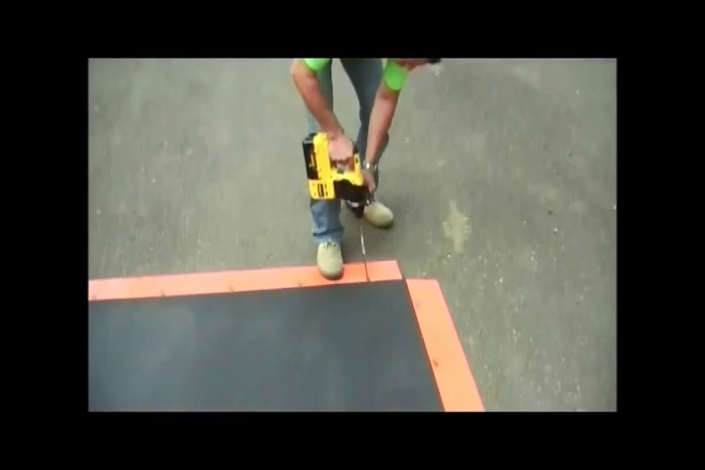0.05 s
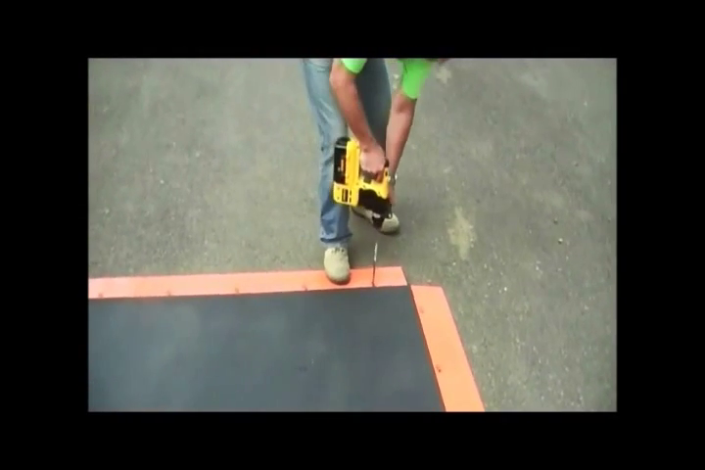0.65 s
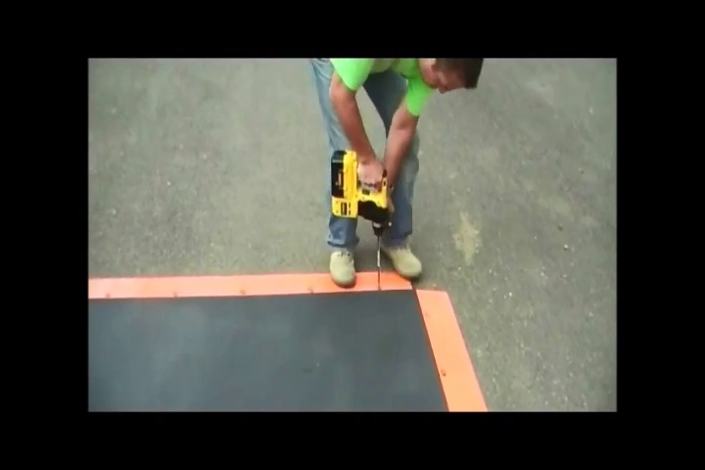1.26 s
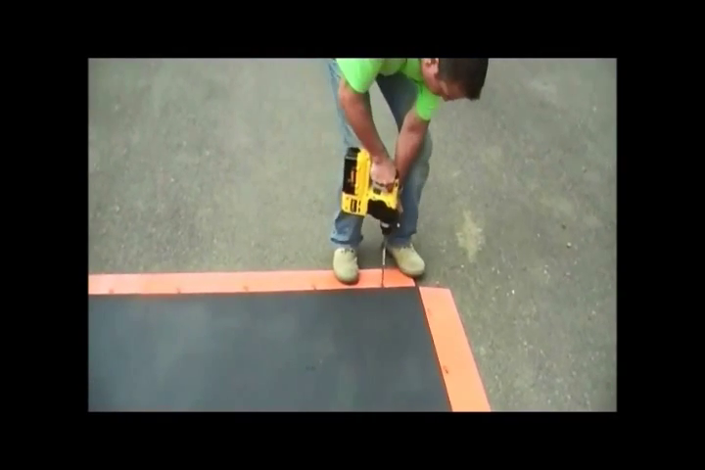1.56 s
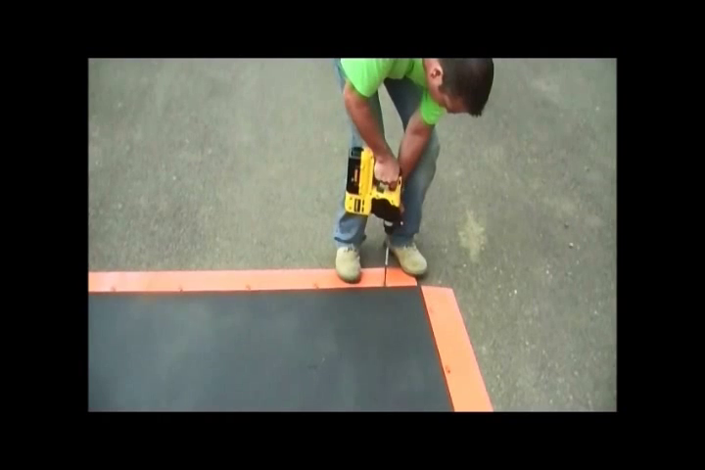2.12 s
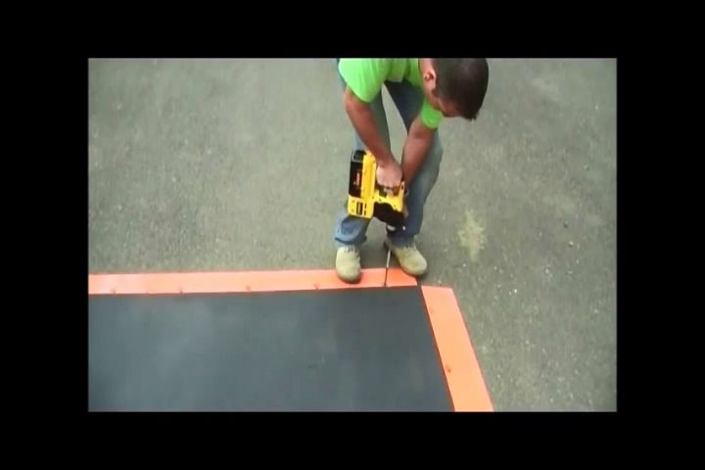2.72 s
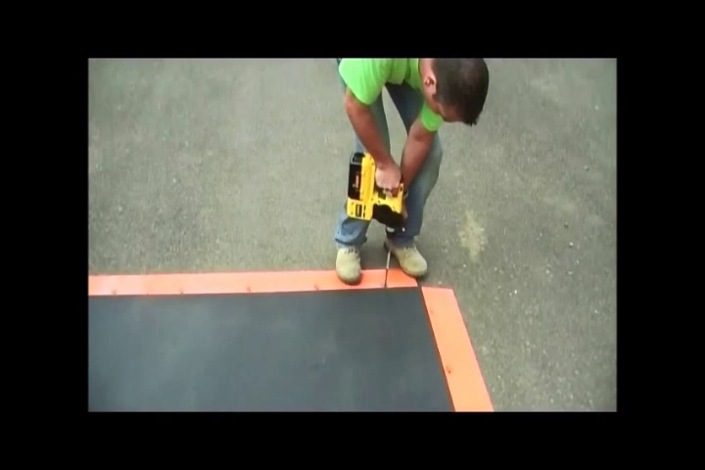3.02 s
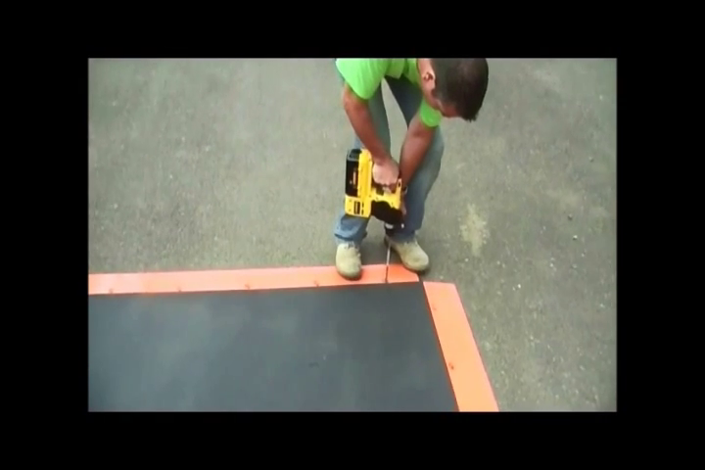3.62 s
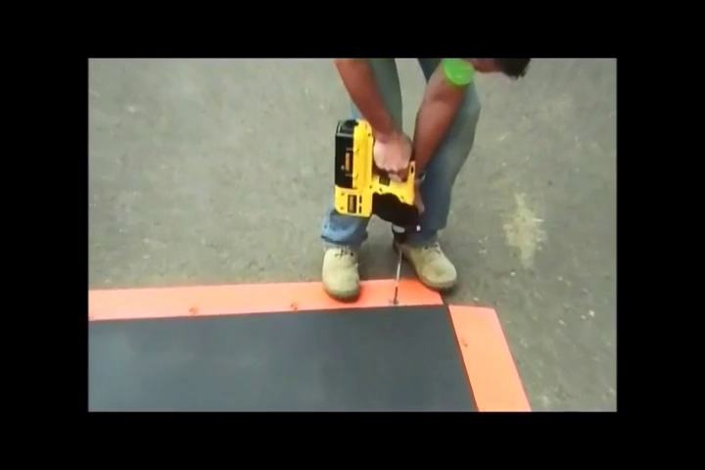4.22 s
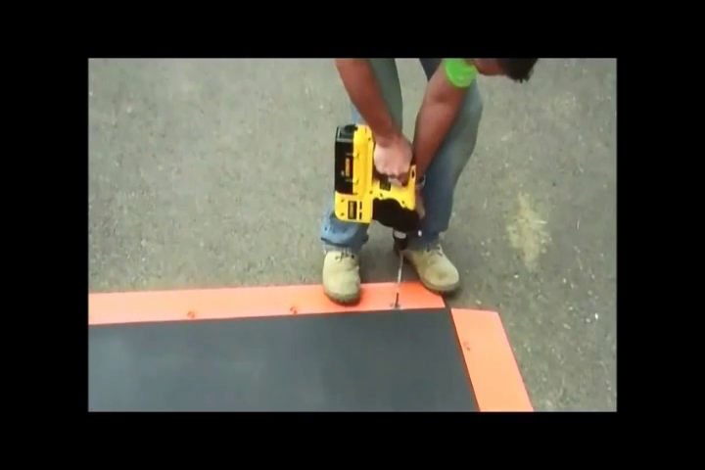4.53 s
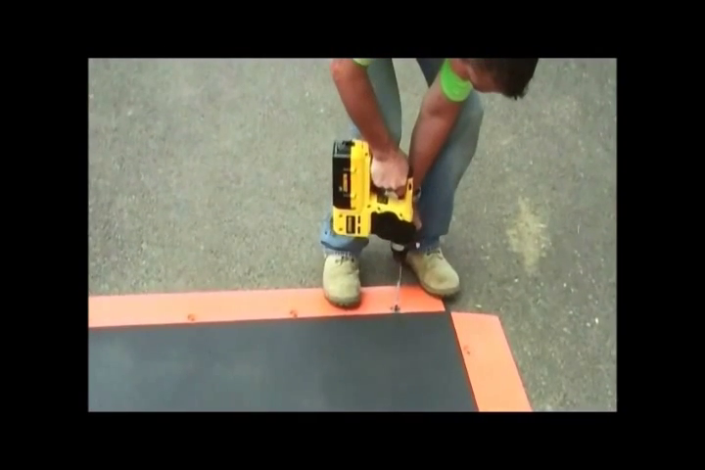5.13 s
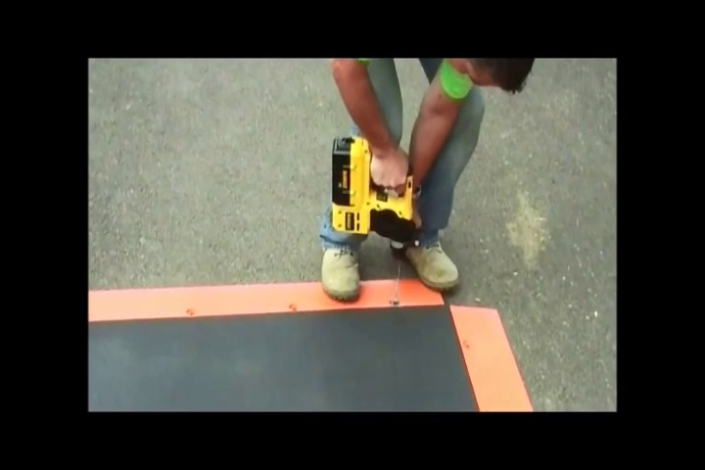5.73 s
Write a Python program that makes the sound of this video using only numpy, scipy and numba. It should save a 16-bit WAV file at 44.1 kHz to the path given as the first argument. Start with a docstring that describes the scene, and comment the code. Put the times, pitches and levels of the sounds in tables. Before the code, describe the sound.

Faint distant traffic and a thin hiss set an outdoor scene. From about 0.2 to 0.9 seconds a cordless hammer drill is handled with a few light clicks, and at 0.6 seconds one short trigger blip coasts down with a faint scratchy squeak. At 1.3 seconds the drill starts loudly, fairly close and slightly left: very rapid hammering, sharp metallic cracks, a ringing bit and gritty grinding as it bites into pavement. It softens a little around 1.6 seconds, then steadies. The pierced plastic edging adds a buzz, strongest near 2.8 seconds, and the hammering gradually slows under load. Around 4.5 to 4.7 seconds the shank clanks, the level dips and the hammer nearly stalls. By 4.8 seconds it picks up again with a brief rising metallic note and a wavering gear whine, boring on until the end at about 5.8 seconds.

```python
"""A cordless hammer drill bores through plastic edging into pavement, outdoors. Each cycle the piston
thuds, the striker cracks on the steel bit and the tool rebounds; edging, housing and bit ring, and gears
and flutes grind between blows. Late on, the hammer nearly stalls, then picks up with a gear whine.
Handling clicks and one blip of the trigger come first. Distant traffic lies underneath."""
import sys
import numpy as np
from scipy import signal
from scipy.fft import rfft, irfft, next_fast_len
from scipy.io import wavfile
from scipy.ndimage import uniform_filter1d
from numba import njit

SR = 44100
rng = np.random.default_rng(int(sys.argv[2]) if len(sys.argv) > 2 else 0)


def to_wav(sig):
    """Store sig (one row per channel, or 1-D mono) as 16-bit WAV at the path in sys.argv[1].

    Samples outside -1..1 are clipped; the rate is SR.
    """
    pcm = np.clip(np.atleast_2d(sig), -1, 1) * 32767
    pcm = np.round(pcm).astype(np.int16)
    wavfile.write(sys.argv[1], SR, pcm.T)  # frames by channels


N = 254456
T = np.arange(N) / SR

# Hammer speed, sagging under load. Each row: time in seconds, blows per second.
HAMMER_RATE = [(1.27, 21.06), (1.4, 60.22), (1.475, 76.73), (1.66, 76.68), (1.77, 72.85), (1.88, 72.97),
               (2.1, 70.54), (2.21, 68.15), (2.32, 70.76), (2.43, 70.1), (2.54, 72.05), (2.76, 69.7),
               (2.87, 71.79), (3.09, 69.31), (3.2, 70.55), (3.31, 67.75), (3.42, 69.01), (3.53, 67.79),
               (3.75, 67.34), (4.08, 64.03), (4.4, 63.88), (4.44, 54.74), (4.48, 69.75), (4.597, 60.17),
               (4.635, 42.76), (4.9, 61.23), (5.1, 57.28), (5.3, 59.2), (5.43, 61.18), (5.77, 59.39)]
# How hard the tool is leaned on. Each row: time in seconds, push in dB.
PUSH_CURVE = [(1.34, -15.5), (1.51, -18), (1.6, -21), (1.68, -18), (1.74, -20), (1.92, -19), (1.95, -17.5),
              (2.74, -17.5), (2.83, -16), (3.69, -15.5), (3.73, -16.5), (4.51, -16), (4.58, -20),
              (4.7, -21.5), (4.77, -17), (5.74, -16)]
# Blows that stand out. Each row: time in seconds, relative crack level in dB, relative clank level in dB.
SQUARE_BLOWS = [(1.3235, -10, -28), (1.3493, -11, -24), (1.3700, -7, -22), (1.5424, -11, -16),
                (1.7256, -7.5, -21), (1.7665, -15, -15), (1.7942, -15, -22), (4.6035, -30, -13),
                (4.646, -35, -14)]
# Ring of bit and chuck. Each row: multiple of the ring pitch, width in Hz, level in dB,
# change at first bite in dB, change with the bit deep in dB.
RING_MODES = [(.915, 278, 0.5, -6, -7), (1.0, 192, 0, -1.5, 8), (1.295, 227, 2, -9.5, -6)]
# Gear hum. Each row: multiple of the hammer rate, level in dB, change as the bit seats in dB.
GEAR_TONES = [(3, -65, 4), (6, -39.5, -5.5), (7, -54, 10)]
# Handling ticks, and the crack that opens the trigger blip. Each row: time in seconds, relative ring level in
# dB, ring decay in seconds, # relative snap level in dB.
CLICKS = [(0.2434, -23, 0.0034, -27), (0.2814, -24.5, 0.0058, -31), (0.299, -32, 0.0025, -48),
          (0.524, -33, 0.003, -60), (.626, -18, .003, -13), (0.9097, -20.5, 0.0032, -15)]

# Pitch curves. Each row: time in seconds, pitch in Hz.
BIT_RING_PITCH = [(1.35, 1993), (4.36, 2005), (5.77, 2150)]
GEAR_WHINE_PITCH = [(4.74, 1000), (4.85, 1070), (4.98, 1087), (5.08, 1045), (5.17, 1087), (5.27, 1030),
                    (5.45, 1100), (5.6, 1075)]

# Resonances. Each row: centre in Hz, width in Hz, gain in dB.
HOUSING_PRE_STALL = [(954, 256, 4), (1205, 64, -9)]
HOUSING_POST_STALL = [(970, 190, 4.5), (1089, 25, -6), (1420, 120, -1.5)]
FREE_SHANK_MODES = [(4340, 790, -6), (5760, 610, -0.5)]
HANDLED_CASING_MODES = [(980, 250, -5), (1920, 220, 2.5), (2570, 180, 3), (3100, 380, -1.5),
                        (4370, 800, -2), (5830, 300, 0), (6540, 350, -1)]
# Narrow high peaks that give each crack a metallic ring. Each row: centre in Hz, width in Hz, gain in dB.
CRACK_TREBLE_PEAKS = [(6060, 420, 0), (6730, 480, -2), (7930, 330, -1.5), (9720, 260, -5)]

# Source spectra. Each row: frequency in Hz, relative level in dB.
EARLY_BUZZ_EQ = [(40, -25), (140, -39), (260, -5.5), (560, -5.5), (700, 5), (1000, -0.5), (1500, -28.5)]
EDGING_PIERCED_EQ = [(40, -60), (140, -28), (280, -18), (400, -11.5), (490, -1), (525, -16.5), (570, -4.5),
                     (630, 1), (710, 4.5), (790, 4), (1000, -17), (1500, -37.5)]
EDGING_PINNED_EQ = [(40, -48), (130, -27), (180, -18.5), (260, -13), (360, -1), (520, -7), (700, 2),
                    (1000, 2.5), (1500, -46)]
GRIND_PRE_STALL_EQ = [(300, -28.5), (1400, -5.5), (2300, -4), (2950, -1), (3270, 1), (3900, -2),
                      (4420, 2.5), (5100, -3.5), (5650, -1.5), (6200, -4), (7200, -6.5), (9000, -13.5),
                      (12500, -25)]
GRIND_POST_STALL_EQ = [(300, -30.5), (1000, -8), (1180, -26), (1330, -18), (1430, -0.5), (2500, 0.5),
                       (3900, -2), (4380, -0.5), (5200, -4), (5600, -1.5), (6200, -5.5), (7100, -4.5),
                       (9000, -14), (12500, -28.5)]
BITE_EQ = [(200, -22), (480, -3.5), (1300, -15), (1900, 0), (2300, 6.5), (3200, -3.5), (5000, -12.5),
           (12500, -32)]
CRACK_EQ = [(1500, -49), (4000, -24), (5500, -4.5), (6600, 1.5), (7300, 4.5), (8100, -2.5), (9100, -8.5),
            (9750, -6), (10400, -13), (12500, -26)]
SHANK_EQ = [(300, -27), (1400, -25), (2050, 5), (2700, -1), (3500, -9), (4500, 3.5), (5250, 2), (5700, 4),
            (6400, 1), (7500, -18), (12500, -24)]
BLIP_EQ = [(40, -28), (140, -28), (260, 1.5), (520, -4), (800, 6), (1400, -1), (4600, 0.5), (7000, -2.5),
           (9000, -19), (12000, -29)]
SNAP_EQ = [(200, -30), (4800, -8), (6200, 1), (8800, -3), (9700, -15), (12500, -22)]
OUTDOOR_EQ = [(30, -37), (100, -13.5), (250, -3.5), (570, -3), (830, 5), (1300, -2.5), (2400, -6),
              (4200, -7.5), (4900, -1), (5280, 3), (5750, -3), (6800, -8.5), (10300, -29), (12000, -48)]

# Scattered sound. Each row: frequency in Hz, level against the direct sound in dB.
SCATTER_EQ = [(60, -8), (280, -18), (700, -10), (2000, -10)]
# Stereo balance. Each row: frequency in Hz, left minus right in dB.
BALANCE_EQ = [(100, .7), (300, -0.5), (630, 5), (1140, 2.5), (2050, 3.5), (4000, -0.7), (8000, 2)]

START_S, STALL_S = 1.26, 4.69
# Stages of the boring. Each pair: start and end in seconds.
PIERCE_S, DEEPEN_S, DAMP_S, PIN_S = (1.57, 2.19), (2.8, 4.5), (3.16, 4.23), (3.92, 4.41)
RESTART_S, SEAT_S = (4.66, 4.72), (STALL_S, 5.61)


def drill():
    """Every knock shakes edging, housing and bit; grinding fills the gaps."""
    pierced, deep, restarted, seated = ramp(*PIERCE_S), ramp(*DEEPEN_S), ramp(*RESTART_S), ramp(*SEAT_S)
    # easing off just before the stall frees the shank
    eased = envelope(4.448, hold_s=0.16, attack_s=0.005, release_s=0.029) * (1 - restarted)
    cycles, piston, striker, rebound = hammer(restarted)
    knocks = 0.75 * piston + striker + 0.95 * rebound
    jolts = (0.99 + 0.43 * deep) * piston + striker + 0.77 * rebound
    rattle = rattle_envelope(jolts, restarted, eased)
    # heavy parts nearly rest between knocks until the restart keeps them trembling
    thuds = unit(np.sqrt(np.maximum(fade(jolts ** 2, decay_s=0.0016), 0)))
    tremble = thuds + 0.56 * restarted + 0.5 * rattle

    body = edging_buzz(knocks, piston, striker, tremble, pierced, deep, seated)
    body += housing_ring(jolts, tremble, restarted, eased)
    body += bit_ring(knocks, rattle, pierced, deep, seated) + bit_note(seated)
    direct = grinding(rattle, restarted) + bit_crack(striker, rebound, deep, restarted)
    direct += shank_clank(striker * eased * undb(-8.5 + 0.5 * push_db()))
    body += gear_tones(cycles, seated)
    return ramp(1.268, 1.278) * (surroundings(body, decay_s=0.038) + direct)


def hammer(restarted):
    """Running cycle count, and impulse trains of piston, striker and rebound."""
    rate_hz = curve(HAMMER_RATE) * ramp(START_S, START_S + 0.072)
    cycles = np.cumsum(rate_hz) / SR
    blows_s = np.interp(np.arange(1, int(cycles[-1]) + 1), cycles, T)
    # the striker idles at the stall, then takes a moment to catch
    blows_s = blows_s[abs(blows_s - STALL_S) > 0.035]
    caught = 1 - restarted + ramp(4.73, 4.87)
    piston = contacts(blows_s, delay_s=-0.0034, jitter_s=0.00005, spread_db=1)
    striker = contacts(blows_s, delay_s=-0.0009, jitter_s=0.0001, spread_db=1.1, alternate_db=1.6)
    rebound = contacts(blows_s, delay_s=0.0031, jitter_s=0.0005, spread_db=2.2)
    return cycles, caught * piston, caught * striker, caught * rebound


def contacts(blows_s, delay_s, jitter_s, spread_db, alternate_db=0, guided_s=2.6):
    """One uneven contact a cycle; every second one can be softer until the hole guides the bit."""
    timing, force = rng.standard_normal((len(blows_s), 2)).T
    softer = (blows_s < guided_s) & (np.arange(len(blows_s)) % 2 == 0)
    return pulses(blows_s + delay_s + jitter_s * timing, undb(spread_db * force - alternate_db * softer))


def rattle_envelope(jolts, restarted, eased):
    """Loose parts rattle on after each knock, over steady grinding that grows with the push."""
    steady_db = 4.3 + 0.33 * push_db() * (1 - restarted) - 0.5 * eased
    return unit(np.sqrt(fade(jolts ** 2, decay_s=0.0015) + 0.17 * undb(2 * steady_db)))


def bit_crack(striker, rebound, deep, restarted):
    """Striker on steel: a stress wave runs up and down the bit for about a millisecond."""
    burst = uniform_filter1d(fade(striker + 0.1 * rebound, decay_s=0.0007), int(0.0007 * SR))
    burst *= undb(1.9 * walk(140))  # the bit seats differently on each blow
    chatter = 0.004 + 0.014 * ramp(START_S, STALL_S) ** 2
    crack = colour((burst + chatter) * stereo_noise(apart=1), CRACK_EQ)
    tick = colour(striker, CRACK_EQ)
    crack = blend(crack, tick, 0.3 * (1 - deep))
    crack = blend(crack, modes(striker, CRACK_TREBLE_PEAKS), 0.21 * (1 - 0.5 * restarted))
    bare_db = 7.5 * die_away(START_S, decay_s=0.94)  # the hole muffles the sinking bit
    return at_level(crack, -21 + load_db(per_push=1.2, depth_db=-3, restart_db=-1.5) + bare_db)


def bit_ring(knocks, rattle, pierced, deep, seated):
    """Bit and chuck ring; the pitch scatters while the tip skates without a hole."""
    pitch_hz = curve(BIT_RING_PITCH) * (1 + 0.05 * (1 - pierced) * walk(70))
    ring = np.zeros(N)
    for k, (multiple, width_hz, db, bite_db, deep_db) in enumerate(RING_MODES):
        drive = unit(knocks) + 1.5 * rattle * noise()
        gain = (-1) ** k * undb(db + bite_db * (1 - pierced) + deep_db * deep)
        ring += gain * resonance(drive, multiple * pitch_hz, width_hz)
    return at_level(ring, -17.5 + load_db(per_push=2, depth_db=-0.75, restart_db=-3.5) - 4 * seated)


def bit_note(seated):
    """The bit sings a narrow rising note as it takes up the load again."""
    note = np.sqrt(2) * np.sin(phase(2003 + 297 * seated) + 0.5 * walk(90))
    swell = envelope(4.76, hold_s=0.062, attack_s=0.016, release_s=0.13)
    return note * swell * undb(-25.5 + 2.5 * walk(60))


def grinding(rattle, restarted):
    """Gears and flutes grind, grit breaks in uneven grains; the surface crumbles at the first bite."""
    grit = rattle * stereo_noise(apart=0.35) * undb(1.84 * walk(900))
    grind = blend(colour(grit, GRIND_PRE_STALL_EQ), colour(grit, GRIND_POST_STALL_EQ), restarted)
    grind = at_level(grind, -19 + load_db(per_push=1.52, depth_db=1, restart_db=2.5))
    crumbs = unit(colour(grit * undb(3.2 * walk(300)), BITE_EQ))
    return grind + crumbs * undb(-21.5) * envelope(1.315, hold_s=0.043, attack_s=0.016, release_s=0.15)


def edging_buzz(knocks, piston, striker, tremble, pierced, deep, seated):
    """Rough buzz with low thumps at first; then the pierced plastic strip buzzes, damped once pinned."""
    drive = shaken(striker + 0.25 * piston, tremble, rough=0.8) * undb(1.2 * walk(14))
    early_buzz = colour(shaken(knocks, tremble, rough=3.6), EARLY_BUZZ_EQ)
    buzz = blend(early_buzz, colour(drive, EDGING_PIERCED_EQ), 0.79 * pierced)
    buzz += deep * resonance(buzz, hz=627 - 50 * deep, width_hz=90)
    pinned = colour(shaken(piston + 0.33 * striker, tremble, rough=1), EDGING_PINNED_EQ)
    buzz = blend(buzz, pinned, ramp(*PIN_S))
    cutting_db = envelope(2.7, hold_s=0.14, attack_s=0.31, release_s=0.27)  # flutes cut the strip
    stage_db = cutting_db - 8.5 * ramp(*DAMP_S) - 3.5 * seated
    return at_level(buzz, -26 + load_db(per_push=1.47, depth_db=2, restart_db=6) + stage_db)


def housing_ring(jolts, tremble, restarted, eased):
    """Jolts ring the housing; its resonances shift at the stall."""
    drive = shaken(jolts, tremble, rough=1.3)
    ring = blend(modes(drive, HOUSING_PRE_STALL), modes(drive, HOUSING_POST_STALL), restarted)
    return at_level(ring, -25.5 + load_db(per_push=2.5, depth_db=0.5, restart_db=1.5) - 1.5 * eased)


def shank_clank(blows, swell_s=0.0015):
    """The free shank clashes in the chuck and rings for a few milliseconds."""
    shape = uniform_filter1d(fade(blows, decay_s=0.0017), int(swell_s * SR))
    shape = np.roll(shape, int(swell_s * SR / 2))
    clash = shape * unit(colour(stereo_noise(apart=0.5), SHANK_EQ))
    return 1.66 * clash + undb(35) * modes(blows, FREE_SHANK_MODES)


def square_blows():
    """Single blows land squarely as the bit meets the pavement and as the hammer slows."""
    times_s, crack_db, clank_db = np.transpose(SQUARE_BLOWS)
    bursts = fade(pulses(times_s, undb(crack_db)), decay_s=0.001)
    crack = 2 * bursts * unit(colour(stereo_noise(apart=1), CRACK_EQ))
    return crack + shank_clank(pulses(times_s, undb(clank_db)))


def gear_tones(cycles, seated, whine_db=-30.5):
    """Loaded gears hum and whine after the stall; play in them makes the tones waver."""
    hum_phase = 2 * np.pi * (cycles + 0.015 * walk(35))
    hum = sum(undb(db + seated_db * seated + 4.1 * walk(30)) * np.sin(multiple * hum_phase)
              for multiple, db, seated_db in GEAR_TONES)
    whine_phase = phase(curve(GEAR_WHINE_PITCH)) + 0.8 * walk(130)
    whine = undb(whine_db + 2.6 * walk(50)) * np.sin(whine_phase)
    octave = undb(whine_db + 3.7 * walk(50)) * np.sin(2 * whine_phase)
    return np.sqrt(2) * ramp(4.72, 4.85) * (hum + whine + octave)


def trigger_blip(start_s=0.6277, coast_s=0.727, housing_hz=1020, ring_s=0.003):
    """The gears jerk and ring the housing, then coast with a falling, scratchy squeak."""
    jolt = undb(-18.5) * envelope(start_s, hold_s=0.016, attack_s=0.0013, release_s=0.0024)
    whirr = undb(-31.5) * envelope(start_s - 0.01, hold_s=0.032, attack_s=0.0045, release_s=0.018)
    run_down = undb(-41) * envelope(start_s, hold_s=0.016, attack_s=0.003, release_s=0.13)
    jerk = unit(colour(noise() * undb(1.4 * walk(600)), BLIP_EQ)) * (jolt + whirr + run_down)
    swing = undb(2) * fade(jolt, ring_s) / (ring_s * SR)
    ring = swing * np.sin(2 * np.pi * housing_hz * T + 0.6 * walk(200))
    squeak_hz = 3320 + 330 * die_away(coast_s, decay_s=0.05)
    scratch = resonance(noise(), squeak_hz * (1 + 0.022 * walk(70)), width_hz=330) * undb(3 * walk(150))
    coast = undb(-47.5) * envelope(coast_s, hold_s=0.16, attack_s=0.013, release_s=0.017)
    return surroundings(jerk + ring + unit(scratch) * coast, decay_s=0.015)


def clicks():
    """The tool is gripped and lined up, and the trigger snaps: each tick is a bright snap and a short ring of
    the casing."""
    ring_shape, snap_shape = np.zeros((2, N))
    for time_s, ring_db, decay_s, snap_db in CLICKS:
        ring_shape += undb(ring_db) * envelope(time_s, hold_s=0, attack_s=0.00045, release_s=decay_s)
        snap_shape += undb(snap_db) * envelope(time_s, hold_s=0, attack_s=0.00023, release_s=0.0012)
    ring = surroundings(unit(modes(noise(), HANDLED_CASING_MODES)) * ring_shape, decay_s=0.004)
    snap = unit(colour(stereo_noise(apart=0.73), SNAP_EQ)) * snap_shape
    return undb(-5.5) * (ring + snap)


def outdoors(hum_hz=570):
    """Distant traffic, a thin high hiss, and a hollow tone and faint hum that soon sink away."""
    air = unit(colour(stereo_noise(apart=0.74), OUTDOOR_EQ)) * undb(-47 + 1.2 * walk(8))
    hum = np.sin(phase(hum_hz * (1 + 0.0058 * walk(9.1))))
    hum *= undb(-54.5 + 2 * walk(3.9) - 10 * ramp(0.32, 0.38))
    hollow = unit(resonance(noise(), hz=430, width_hz=110)) * undb(-36.5) * die_away(0, decay_s=0.024)
    return air + hum + hollow


def surroundings(x, decay_s, size=4096):
    """Ground and nearby things scatter a short tail, opposite in the two channels."""
    tail = rng.standard_normal(size) * np.exp(-np.arange(size) / SR / decay_s)
    side = signal.fftconvolve(colour(x, SCATTER_EQ), tail / np.sqrt(np.sum(tail ** 2)))[:N]
    return np.array([x + side, x - side])


def push_db(full_db=-16):
    """Push relative to full push."""
    return curve(PUSH_CURVE) - full_db


def load_db(per_push, depth_db, restart_db):
    """A part's level change with motor run-up, push, hole depth and restart."""
    run_up_db = -26 * die_away(START_S, decay_s=0.039)
    stage_db = depth_db * ramp(START_S, STALL_S) + restart_db * ramp(STALL_S, STALL_S + 0.15)
    return run_up_db + per_push * push_db() + stage_db


def at_level(x, db):
    """Bring the running rms close to a level curve."""
    power = uniform_filter1d(x ** 2, SR // 8)
    return x * undb(db) / np.sqrt(np.maximum(power, 0) + 0.02 * np.mean(x ** 2))


def shaken(blows, tremble, rough):
    """Blows plus a share of rattling noise."""
    return unit(blows) + rough * unit(tremble * noise())


def pulses(times_s, sizes):
    """Impulses, each shared between two samples."""
    at = np.clip(times_s * SR, 0, N - 2)
    whole = at.astype(int)
    late = at - whole
    return np.bincount(whole, sizes * (1 - late), N) + np.bincount(whole + 1, sizes * late, N)


def fade(x, decay_s):
    """Give every impulse an exponential tail."""
    return signal.lfilter([1], [1, -np.exp(-1 / (decay_s * SR))], x + 1e-18)


def modes(x, table):
    """Parallel resonances."""
    return sum(undb(db) * resonance(x, hz, width_hz) for hz, width_hz, db in table)


def resonance(x, hz, width_hz):
    """Two band-passes in series, for steep skirts."""
    hz, width_hz = hz * np.ones(N), float(width_hz)
    return svf(svf(x, hz, width_hz), hz, width_hz)


@njit
def svf(x, hz, width_hz):
    """State-variable band-pass with a movable centre."""
    y, band_state, low_state = np.empty(len(x)), 0., 0.
    for i in range(len(x)):
        g, damping = np.tan(np.pi * hz[i] / SR), width_hz / hz[i]
        band = (band_state + g * (x[i] + 1e-18 - low_state)) / (1 + g * (g + damping))
        band_state = 2 * band - band_state
        low_state += 2 * g * band
        y[i] = damping * band
    return y


def colour(x, points, size=4096):
    """Minimum-phase filter through (Hz, dB) points."""
    hz, db = np.transpose(points)
    bins_hz = np.maximum(np.arange(size // 2 + 1) * SR / size, 1)
    cepstrum = irfft(np.log(undb(np.interp(np.log(bins_hz), np.log(hz), db))))
    cepstrum[1:size // 2] *= 2
    cepstrum[size // 2 + 1:] = 0
    impulse = irfft(np.exp(rfft(cepstrum)))
    length = next_fast_len(N + size)
    return irfft(rfft(x, length) * rfft(impulse, length), length)[..., :N]


def noise():
    """White noise, rms 1."""
    return rng.standard_normal(N)


def stereo_noise(apart):
    """Two channels of partly shared noise."""
    return unit(noise() + apart * np.array([noise(), noise()]))


def walk(rate_hz):
    """Smooth random wander, spread near 1."""
    hold = max(int(SR / rate_hz), 2)
    steps = np.repeat(rng.standard_normal(N // hold + 1), hold)
    return 1.3 * uniform_filter1d(uniform_filter1d(steps, hold), hold)[:N]


def envelope(full_s, hold_s, attack_s, release_s):
    """Exponential swell up to full_s, hold, decay."""
    return np.exp(np.minimum(T - full_s, 0) / attack_s) * die_away(full_s + hold_s, release_s)


def die_away(start_s, decay_s):
    """1 until start_s, then exponential decay."""
    return np.exp(-np.maximum(T - start_s, 0) / decay_s)


def ramp(start_s, end_s):
    """Linear rise from 0 to 1."""
    return np.clip((T - start_s) / (end_s - start_s), 0, 1)


def curve(table):
    """Straight lines through (seconds, value) rows."""
    return np.interp(T, *np.transpose(table))


def phase(hz):
    """Radians run up by a moving pitch."""
    return 2 * np.pi * np.cumsum(hz) / SR


def blend(before, after, share):
    """Cross-fade two sounds, each at rms 1."""
    return (1 - share) * unit(before) + share * unit(after)


def unit(x):
    """Scale to rms 1."""
    return x / np.sqrt(np.mean(x ** 2) + 1e-18)


def undb(db):
    """Decibels to gain."""
    return 10 ** (np.asarray(db) / 20)


def scene():
    """The drill in open air, a little to the left."""
    left, right = drill() + square_blows() + trigger_blip() + clicks() + outdoors()
    return np.array([colour(left, [(hz, db / 2) for hz, db in BALANCE_EQ]),
                     colour(right, [(hz, -db / 2) for hz, db in BALANCE_EQ])])


def record(dry, ceiling=0.92, top_hz=12100):
    """Soft-clip the highest peaks and cut the top."""
    rounded = dry / (1 + (dry / ceiling) ** 6) ** (1 / 6)
    return signal.sosfilt(signal.ellip(8, 0.2, 70, top_hz, fs=SR, output="sos"), rounded)


dry = scene()
out = record(dry)
to_wav(out)
```